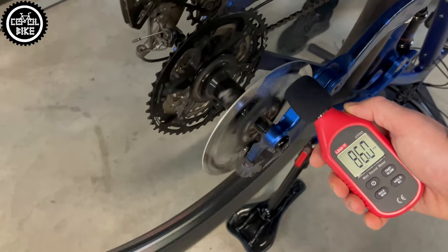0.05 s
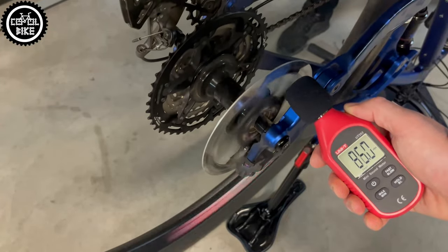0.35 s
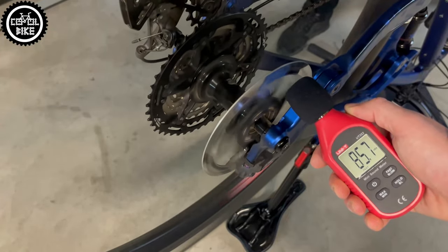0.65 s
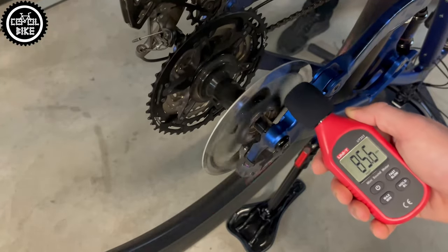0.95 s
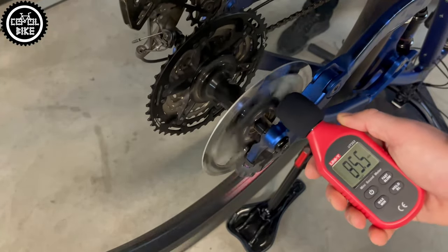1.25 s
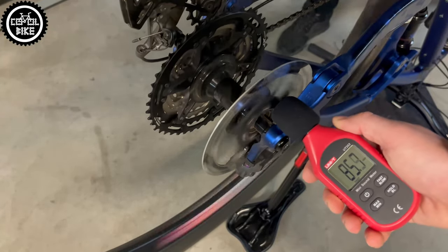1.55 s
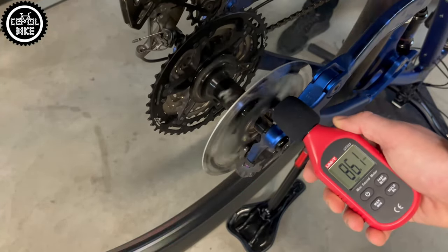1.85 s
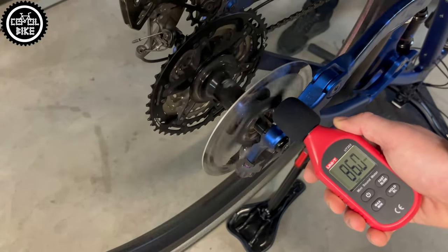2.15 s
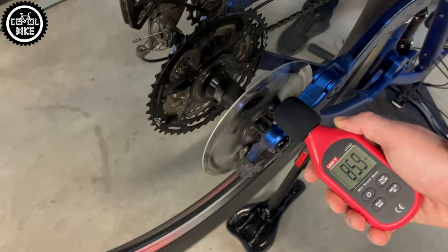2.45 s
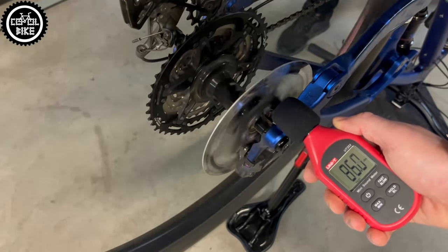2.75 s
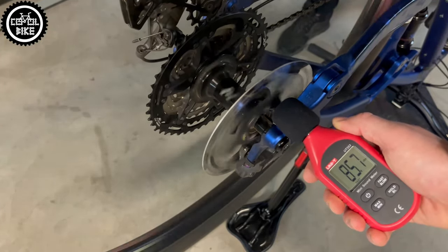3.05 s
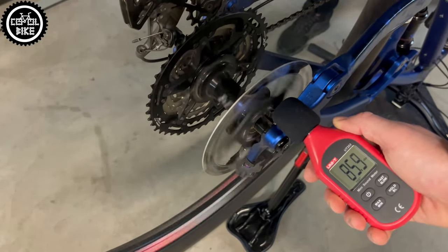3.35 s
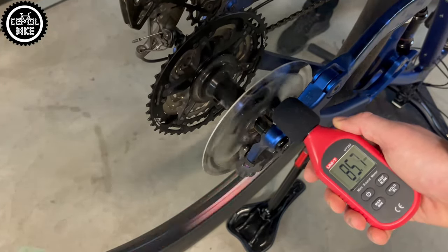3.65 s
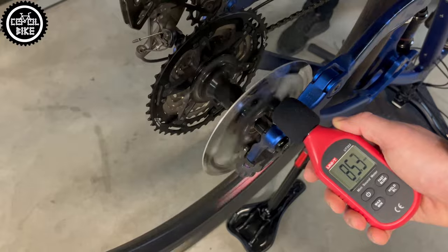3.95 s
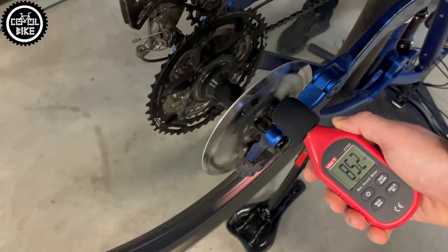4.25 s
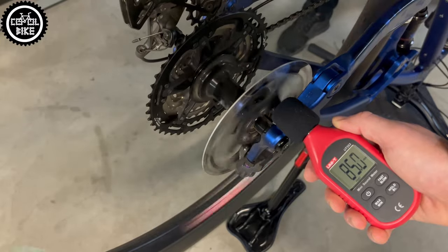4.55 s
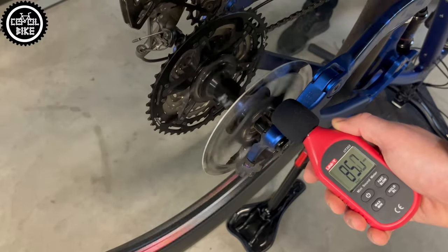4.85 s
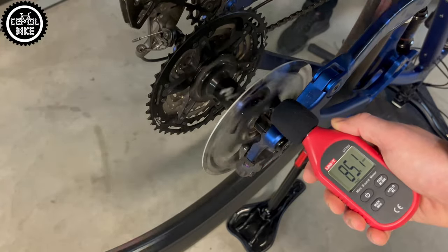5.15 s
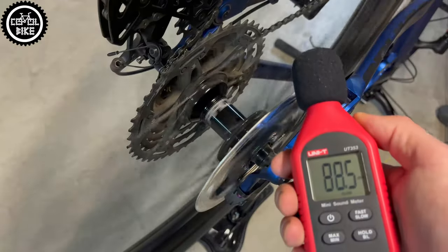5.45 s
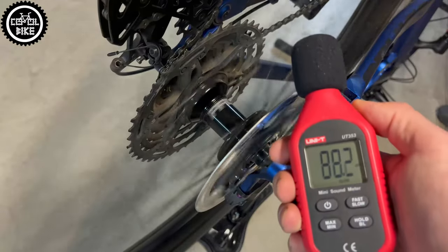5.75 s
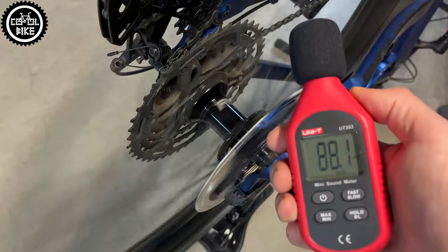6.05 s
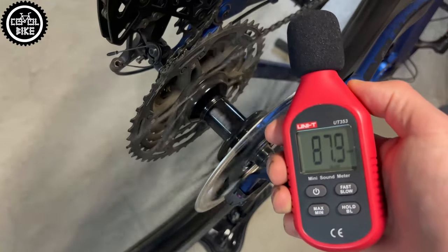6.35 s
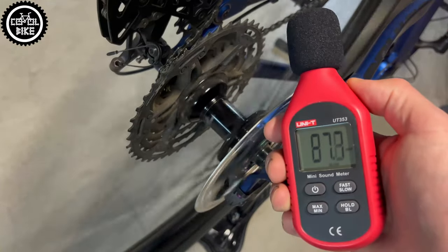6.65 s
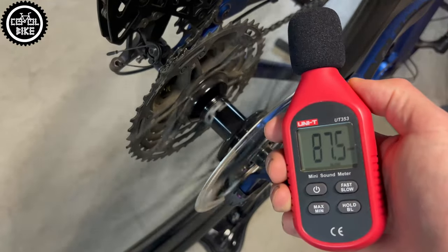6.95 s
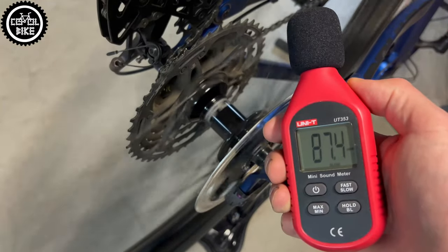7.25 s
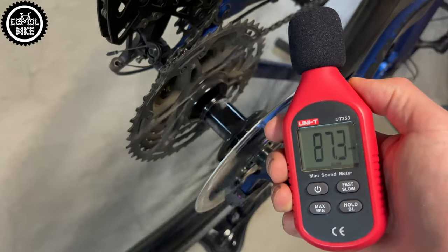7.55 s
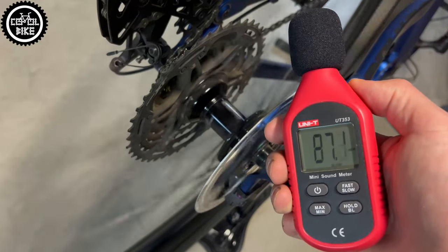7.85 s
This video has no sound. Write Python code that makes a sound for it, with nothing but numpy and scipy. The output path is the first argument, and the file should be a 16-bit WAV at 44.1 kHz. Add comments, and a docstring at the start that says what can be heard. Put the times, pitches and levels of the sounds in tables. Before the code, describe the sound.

Heard close up in a workshop, the freewheel of a spinning bicycle wheel gives a high, sizzling buzz with a lightly throbbing metal ring. Its pitch eases downward as the wheel slows. About two thirds of the way through, a different hub abruptly replaces it, buzzing lower and rougher and gently winding down too. Soft air from the spokes and a quiet, steady room hum lie beneath both.

```python
"""A rasping hiss: a bicycle rear wheel with a fine-toothed hub coasts on a stand in a workshop.
At 5.4 s a second wheel takes over; its coarser hub buzzes lower. In each hub sprung pawls drop off
the ratchet teeth hundreds of times a second, bounce, and ring hub and cassette. Both wheels slow, so
overtones sink through the resonances. Spokes stir the air, with a low push once a turn; the room drones."""
import sys
import numpy as np
from scipy import signal
from scipy.fft import rfft, irfft, next_fast_len
from scipy.io import wavfile
from scipy.ndimage import uniform_filter1d, map_coordinates

SR = 44100
rng = np.random.default_rng(int(sys.argv[2]) if len(sys.argv) > 2 else 0)


def pcm_store(signal):
    """Save signal as 16-bit PCM."""
    levels = np.round(np.clip(np.atleast_2d(signal), -1, 1) * 32767)
    wavfile.write(sys.argv[1], SR, levels.astype(np.int16).T)


N = 348390
TIME_S = np.arange(N) / SR
FFT_SIZE = next_fast_len(N + SR, real=True)
FREQ_HZ = np.fft.rfftfreq(FFT_SIZE, 1 / SR)
LEAD_SAMPLES = SR // 200  # room for pre-ringing in the path responses
FINE_TEETH, COARSE_TEETH = 90, 44
TICK_DB_PER_DOUBLING, AIR_DB_PER_DOUBLING, RUMBLE_DB_PER_DOUBLING = 1, 21, 13  # of wheel speed

# Ratchet speed (time [s], tick rate [Hz])
FINE_RATE_HZ = [(0, 801), (1.4, 725.8), (2.6, 665.9), (3.8, 613), (5.42, 550)]
COARSE_RATE_HZ = [(5.38, 283.05), (6.52, 267.45), (7.9, 250.35)]
# Clean pawl drop against its bounces (frequency [Hz], ratio [dB])
FINE_DROP_DB = [(600, -10), (1800, -15), (3000, -10), (13000, -0.5)]
COARSE_DROP_DB = [(300, -4), (1400, -5.5), (2800, -3), (6000, -16), (13000, 7)]
# Broad tick colour (frequency [Hz], relative level [dB])
FINE_TICK_DB = [(100, -42), (450, -24.5), (1400, -22), (2000, -19), (2300, -11.5), (3500, -14.5),
                (5000, -15.5), (7400, -14.5), (8000, -27), (8800, -14.5), (10400, -16.5), (11500, -9),
                (13100, -12.5), (15000, -14)]
COARSE_TICK_DB = [(100, -34.5), (450, -31), (950, -35.5), (1700, -29), (2200, -17.5), (3400, -17),
                  (5000, -17.5), (6400, -24), (8000, -18), (9800, -14.5), (11800, -11.5), (13100, -22.5),
                  (15000, -27.5)]
# Modes of hub shell, cassette and disc (frequency [Hz], width [Hz], gain over tick colour [dB])
FINE_HUB_MODES = [(637, 15, -1.5), (1140, 170, 3), (1597, 21, 7.5), (1660, 27, 8), (1854, 17, 11.5),
                  (2490, 260, 4.5), (2867, 107, 6), (3044, 364, 11.5), (3400, 270, -1), (3646, 560, 8),
                  (3563, 52, 1), (4530, 160, 2), (4800, 490, 3.5), (5716, 210, 6), (6920, 65, -7),
                  (6910, 460, 6.5), (9900, 88, 5.5), (13170, 570, 12)]
COARSE_HUB_MODES = [(780, 260, 6.9), (1083, 52, 11), (1330, 200, 7), (1500, 100, 9.2), (1720, 88, 4.1),
                    (2066, 30, 7.2), (2500, 180, 9.9), (2816, 380, 10.1), (3034, 810, 10.1),
                    (3730, 150, 4.3), (4576, 64, 6.4), (5789, 440, 4.9), (7080, 420, 9.8), (9200, 380, 6.4),
                    (10350, 290, 4.9), (14080, 2130, 16.3)]
# Stereo width (frequency [Hz], side minus mid [dB])
FINE_WIDTH_DB = [(200, 2.5), (650, 2), (2500, -.5), (7000, 0.5), (8000, 13), (8800, 2.5), (10000, 1.5),
                 (11200, -18), (12900, -5.5), (14000, 0.5), (15000, 12)]
COARSE_WIDTH_DB = [(200, 2), (650, 4), (2800, -1.5), (3800, 3), (4700, 1), (7000, 2), (7900, 7),
                   (9200, 1.5), (10500, -4), (11900, -30), (13600, -3), (15000, 13)]
# Balance (frequency [Hz], left minus right [dB])
FINE_PAN_DB = [(60, 1.5), (110, -3), (200, -5), (380, 5.5), (700, 7), (1290, 3), (2380, 1.5), (4400, 3.5),
               (8120, -0.5), (15000, -0.5)]
COARSE_PAN_DB = [(60, 8), (110, 8), (200, 15), (380, 4), (700, 6), (1290, 2), (2380, 5), (4400, 5),
                 (8120, 0.5), (15000, -0.5)]
# Drift of the ring near 3 kHz (time [s], relative level [dB])
FINE_BELL_DB = [(0.02, -29), (0.3, -30.5), (0.75, -29.5), (1.25, -30.5), (1.7, -30), (2.1, -31.5),
                (2.65, -30.5), (3.2, -31), (3.65, -31), (3.95, -31), (4.45, -31.5), (5.38, -29.5)]
COARSE_BELL_DB = [(5.43, -32), (5.65, -28.5), (6.0, -30), (6.45, -29), (6.9, -30), (7.3, -30), (7.7, -30),
                  (7.88, -29.5)]
# Narrow resonances sung by passing overtones (frequency [Hz], width [Hz], level [dB])
FINE_SINGING_MODES = [(597, 61, -54.5), (671.4, 13, -42), (707, 25, -49.5), (791, 30, -49), (1225, 41, -54),
                      (1570, 40, -51), (1806, 12, -39.5), (2844, 54, -41), (3043, 30, -43)]
COARSE_SINGING_MODES = [(1396, 88, -52.5), (1920, 25, -52), (2050, 45, -48), (2484, 29, -42),
                        (2870, 90, -45)]
# Resonances sung by the coarse ratchet's sidebands (frequency [Hz], width [Hz], level [dB])
SIDEBAND_MODES = [(1812, 17, -46.5), (2260, 200, -45), (2476, 100, -38.5), (2575, 70, -35),
                  (2785, 105, -35), (3054, 140, -39.5)]
# Wheel draught, wheel rumble, workshop drone (frequency [Hz], relative density [dB])
DRAUGHT_SPECTRUM_DB = [(60, -11), (130, -5.5), (190, -3.5), (330, -6), (600, -7.5), (1200, -12.5),
                       (4000, -9.5)]
RUMBLE_SPECTRUM_DB = [(15, -40), (27, -30), (40, -12), (52, 0), (80, -2.5), (115, -9), (250, -18.5),
                      (1000, -52)]
DRONE_SPECTRUM_DB = [(30, -30), (80, -5), (125, -3), (170, 0.5), (260, -5.5), (600, -27), (2000, -48)]
# Workshop reverberation (frequency [Hz], T60 [s])
ROOM_T60_S = [(200, 0.2), (3000, 0.74), (8000, 0.2), (15000, 0.2)]


def fine_hub():
    """Ninety clicks a turn merge into a rasping hiss."""
    angle = wheel_angle(FINE_RATE_HZ, FINE_TEETH)
    force = ratchet(FINE_RATE_HZ, FINE_DROP_DB, FINE_TEETH, jitter_s=50e-6, scatter_db=0,
                    sway_db=0.2, flutter_db=0.23, bounce_s=0.0005, bounces=6)
    ticks = turning_paths(force, angle, lag_s=304.5e-6, wet_db=0, early_db=4)
    throb_db = throb(FINE_BELL_DB, angle, peak_turns=0.475, sharpness=0.89, depth_db=1.5, waver_db=0.8)
    ring = hub_ring(ticks, FINE_RATE_HZ, throb_db, FINE_TICK_DB, FINE_HUB_MODES,
                    FINE_WIDTH_DB, FINE_PAN_DB, level_db=-24, bell_db=-1)
    return ring + singing(FINE_RATE_HZ, FINE_TEETH, FINE_SINGING_MODES, roughness=1, pan_db=5)


def coarse_hub():
    """Half as many clicks a turn make a lower buzz."""
    angle = wheel_angle(COARSE_RATE_HZ, COARSE_TEETH)
    force = ratchet(COARSE_RATE_HZ, COARSE_DROP_DB, COARSE_TEETH, jitter_s=20e-6, scatter_db=1,
                    sway_db=-0.3, flutter_db=0.36, bounce_s=0.002, bounces=9)
    ticks = turning_paths(force, angle, lag_s=388e-6, wet_db=6, early_db=7.5)
    throb_db = throb(COARSE_BELL_DB, angle, peak_turns=0.17, sharpness=1.3, depth_db=3.5, waver_db=0.5)
    ring = hub_ring(ticks, COARSE_RATE_HZ, throb_db, COARSE_TICK_DB, COARSE_HUB_MODES,
                    COARSE_WIDTH_DB, COARSE_PAN_DB, level_db=-26, bell_db=-3.5)
    overtones = singing(COARSE_RATE_HZ, COARSE_TEETH, COARSE_SINGING_MODES, roughness=1, pan_db=6)
    # uneven running puts a sideband under each overtone
    sidebands = singing(COARSE_RATE_HZ, COARSE_TEETH, SIDEBAND_MODES, roughness=0.47, pan_db=3.5,
                        below_per_turn=9)
    return ring + overtones + sidebands


def ratchet(rate, drop, teeth, jitter_s, scatter_db, sway_db, flutter_db, bounce_s, bounces):
    """Force on the hub: a pawl drops at every tooth, then bounces."""
    teeth_passed = np.cumsum(over_time(rate)) / SR
    tooth = np.arange(1, int(teeth_passed[-1]))
    drop_s = np.interp(tooth, teeth_passed, TIME_S) + jitter_s * rng.standard_normal(len(tooth))
    # toothed ring out of true: spring force sways twice a turn
    sway = np.cos(4 * np.pi * tooth / teeth)
    flutter = wobble(60, drop_s)
    sizes = amp(sway_db * sway + flutter_db * flutter + scatter_db * rng.standard_normal(len(tooth)))
    delay_s = bounce_s * rng.exponential(size=(len(tooth), bounces))
    signs = rng.choice([-1, 1], delay_s.shape)
    chatter = unit_rms(pulses(drop_s[:, None] + delay_s, sizes[:, None] * signs))
    drops = unit_rms(pulses(drop_s, sizes))
    ratio = amp(over_freq(drop))
    norm = np.hypot(1, ratio)
    return filtered(drops, ratio / norm) + filtered(chatter, 1 / norm)


def hub_ring(ticks, rate, throb_db, colour, modes, width, pan, level_db, bell_db):
    """Ticks ring the metal: a throbbing bell band near 3 kHz in a sizzle that eases as the wheel slows."""
    modes_db = sum(db / (1 + (2 * (FREQ_HZ - hz) / width_hz) ** 2) for hz, width_hz, db in modes)
    mid, side = rfft(ticks, FFT_SIZE) * minimum_phase(amp(over_freq(colour) + modes_db))
    spectrum = stereo(mid, side * amp(over_freq(width)), over_freq(pan))
    bell_band = 1 / (1 + ((FREQ_HZ - 2850) / 650) ** 6)
    bell = amp(bell_db) * irfft(spectrum * bell_band, FFT_SIZE)[:, :N]
    sizzle = irfft(spectrum * (1 - bell_band), FFT_SIZE)[:, :N]
    sound = amp(TICK_DB_PER_DOUBLING * speed_doublings(rate)) * sizzle + amp(throb_db) * bell
    return amp(level_db) * sound / np.std((bell + sizzle).mean(axis=0))


def throb(drift, angle, peak_turns, sharpness, depth_db, waver_db):
    """Bell band gain [dB]: slow drift, two swells a turn, slight waver."""
    drift_db = over_time(drift) - np.mean(np.transpose(drift)[1])
    return drift_db + depth_db * swell(angle, peak_turns, sharpness, per_turn=2) + waver_db * wobble(22)


def singing(rate, teeth, modes, roughness, pan_db, below_per_turn=0, overtones=13):
    """Each overtone, or a sideband below it, sings while it sinks through a narrow resonance."""
    wheel_hz, angle = over_time(rate) / teeth, wheel_angle(rate, teeth)
    spinning = (TIME_S >= rate[0][0]) & (TIME_S <= rate[-1][0])
    knot_s = np.linspace(0, N / SR, 400)
    sound = np.zeros((2, N))
    for per_turn in teeth * np.arange(1, overtones + 1) - below_per_turn:
        line_hz = per_turn * wheel_hz
        shakes = rng.standard_normal((2, 2, len(knot_s)))
        starts_rad = rng.uniform(0, 2 * np.pi) + rng.normal(0, 0.7, 2)
        for hz, width_hz, db in modes:
            if not line_hz.min() - width_hz < hz < line_hz.max() + width_hz:
                continue
            near = spinning & (np.abs(line_hz - hz) < 2 * width_hz)
            gain = amp(db) * 0.5 ** ((2 * (line_hz[near] - hz) / width_hz) ** 2)
            for channel, shake, start_rad in zip(sound, shakes, starts_rad):
                cos_noise, sin_noise = (roughness * np.interp(TIME_S[near], knot_s, k) for k in shake)
                phase = per_turn * angle[near] + start_rad
                tone = (1 + cos_noise) * np.cos(phase) + sin_noise * np.sin(phase)
                channel[near] += gain * tone / np.sqrt(0.5 + roughness ** 2 / 2)
    return sound * balance(pan_db)


def spoke_air(rate, teeth, draught, rumble, push_turns, draught_db, rumble_db):
    """Spokes and tyre stir the air, more at speed, with a low push once a turn."""
    doublings = speed_doublings(rate)
    push = swell(wheel_angle(rate, teeth), push_turns, sharpness=3.8)
    return (amp(draught_db + AIR_DB_PER_DOUBLING * doublings + 2.4 * push) * draught
            + amp(rumble_db + RUMBLE_DB_PER_DOUBLING * doublings + 8 * push) * rumble)


def turning_paths(force, angle, lag_s, wet_db, early_db, paths=4):
    """Mid/side ticks: the circling pawls radiate along changing paths, alike every half turn."""
    ticks = np.zeros((2, N))
    for k in range(paths):
        facing = np.maximum(0, np.cos(2 * angle + 2 * np.pi * k / paths))
        arrival = signal.oaconvolve((force * facing)[None], room_path(lag_s, wet_db, early_db), axes=1)
        ticks += arrival[:, LEAD_SAMPLES:LEAD_SAMPLES + N]
    return ticks


def room_path(lag_s, wet_db, early_db, early_t60_s=0.033, size=8192):
    """Mid/side impulse response: direct sound, later on the right, plus near reflections and room tail."""
    hz, frame_s, noise = signal.stft(rng.standard_normal((2, size)), SR, nperseg=256)
    decay = amp(-60 * frame_s / over_freq(ROOM_T60_S, hz)[:, None])
    tail = signal.istft(noise * decay, SR, nperseg=256)[1]
    early = rng.standard_normal(tail.shape) * amp(-60 * np.arange(size) / SR / early_t60_s)
    echoes = amp(wet_db) * tail / np.linalg.norm(tail[0])
    echoes += amp(early_db) * early / np.linalg.norm(early[0])
    direct = np.exp(-2j * np.pi * np.fft.rfftfreq(size, 1 / SR) * np.array([[0], [lag_s]]))
    left, right = direct + rfft(echoes)
    mid_side = np.array([left + right, left - right])
    # many paths together favour no broad band
    mid_side /= np.sqrt(uniform_filter1d(np.abs(mid_side) ** 2, size=24, axis=1))
    return np.roll(irfft(mid_side), LEAD_SAMPLES, axis=1)


def workshop_drone(level_db=-59):
    """Steady low noise of the room."""
    return amp(level_db) * stereo_noise(DRONE_SPECTRUM_DB, side_db=-12, pan_db=2)


def wheel_angle(rate, teeth):
    """Rotation so far [rad]."""
    return 2 * np.pi * np.cumsum(over_time(rate)) / SR / teeth


def speed_doublings(rate):
    """Log2 of speed over the table's mean."""
    return np.log2(over_time(rate) / np.mean(np.transpose(rate)[1]))


def swell(angle, peak_turns, sharpness, per_turn=1):
    """Zero-mean bumps locked to the wheel."""
    bump = np.exp(sharpness * (np.cos(per_turn * (angle - 2 * np.pi * peak_turns)) - 1))
    return bump - bump.mean()


def amp(db):
    """Decibels to gain."""
    return 10 ** (np.asarray(db) / 20)


def unit_rms(x):
    """Scale to rms 1."""
    return x / np.sqrt(np.mean(x ** 2) + 1e-20)


def over_freq(table, hz=FREQ_HZ):
    """Interpolate on a log frequency axis."""
    knot_hz, values = np.transpose(table)
    return np.interp(np.log(hz + 1), np.log(knot_hz + 1), values)


def over_time(table):
    """Interpolate to one value per sample."""
    return np.interp(TIME_S, *np.transpose(table))


def wobble(knots_per_s, time_s=TIME_S):
    """Smooth random curve."""
    return map_coordinates(rng.standard_normal(int(N * knots_per_s / SR) + 4), [time_s * knots_per_s])


def filtered(x, response):
    """Apply a frequency response."""
    return irfft(rfft(x, FFT_SIZE) * response, FFT_SIZE)[..., :N]


def minimum_phase(gain):
    """Response of this gain that rings only after the blow."""
    cepstrum = irfft(np.log(gain), FFT_SIZE)
    cepstrum[1:FFT_SIZE // 2] *= 2
    cepstrum[FFT_SIZE // 2 + 1:] = 0
    return np.exp(rfft(cepstrum))


def pulses(time_s, sizes, half_taps=8):
    """Windowed-sinc impulses with sub-sample timing."""
    centre = time_s.reshape(-1, 1) * SR
    taps = np.floor(centre).astype(int) + np.arange(1 - half_taps, half_taps + 1)
    shape = np.sinc(taps - centre) * np.sinc((taps - centre) / half_taps) * sizes.reshape(-1, 1)
    inside = (taps >= 0) & (taps < N)
    return np.bincount(taps[inside], shape[inside], N)


def balance(pan_db):
    """Left and right gains, pan_db apart."""
    return amp(np.outer([0.5, -0.5], pan_db))


def stereo(mid, side, pan_db):
    """Mid/side to panned left/right."""
    return np.array([mid + side, mid - side]) * balance(pan_db)


def stereo_noise(spectrum, side_db, pan_db):
    """Coloured noise, rms 1."""
    mid, side = filtered(rng.standard_normal((2, N)), amp(over_freq(spectrum)))
    return unit_rms(stereo(mid, side * amp(side_db), pan_db))


def scene(switch_s=5.405):
    """Fine wheel, then coarse wheel, over the drone."""
    draught = stereo_noise(DRAUGHT_SPECTRUM_DB, side_db=-12.5, pan_db=1)
    rumble = stereo_noise(RUMBLE_SPECTRUM_DB, side_db=-12, pan_db=3)
    fine = fine_hub() + spoke_air(FINE_RATE_HZ, FINE_TEETH, draught, rumble,
                                  push_turns=0.71, draught_db=-38, rumble_db=-55.5)
    coarse = coarse_hub() + spoke_air(COARSE_RATE_HZ, COARSE_TEETH, draught, rumble,
                                      push_turns=0.64, draught_db=-42, rumble_db=-56)
    return np.where(TIME_S < switch_s, fine, coarse) + workshop_drone()


def record(dry):
    """Brick-wall low-pass at 15.3 kHz."""
    return filtered(dry, FREQ_HZ < 15300)


dry = scene()
out = record(dry)
pcm_store(out)
```